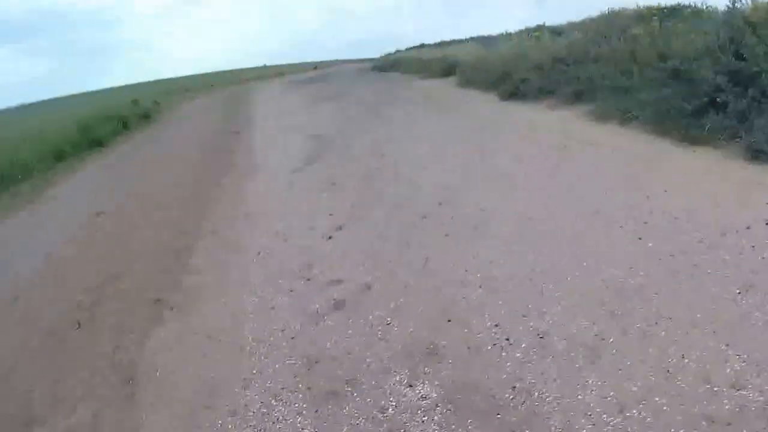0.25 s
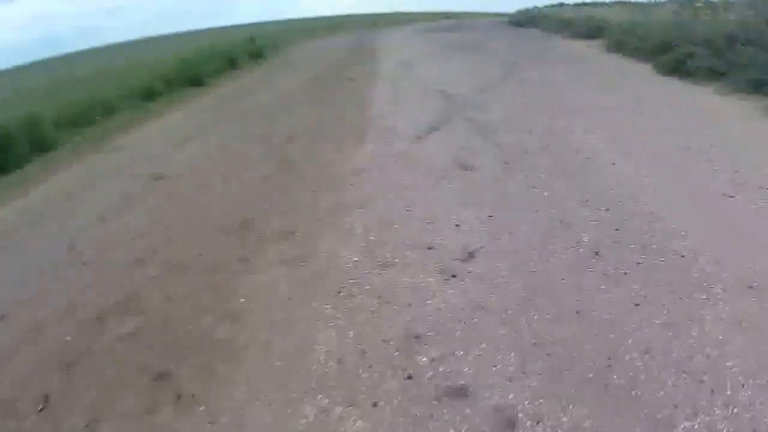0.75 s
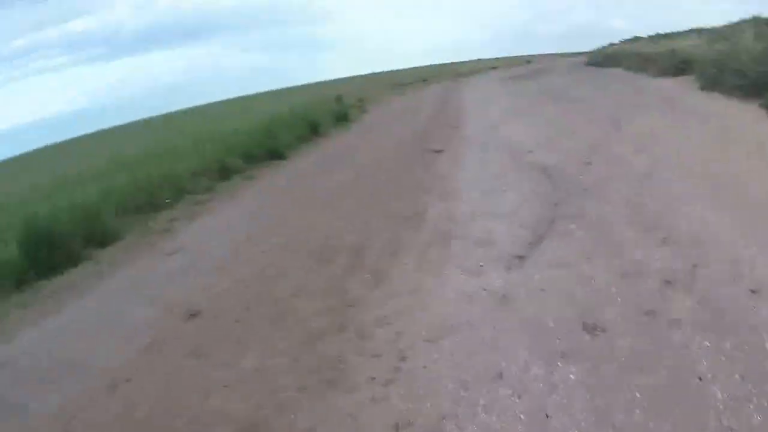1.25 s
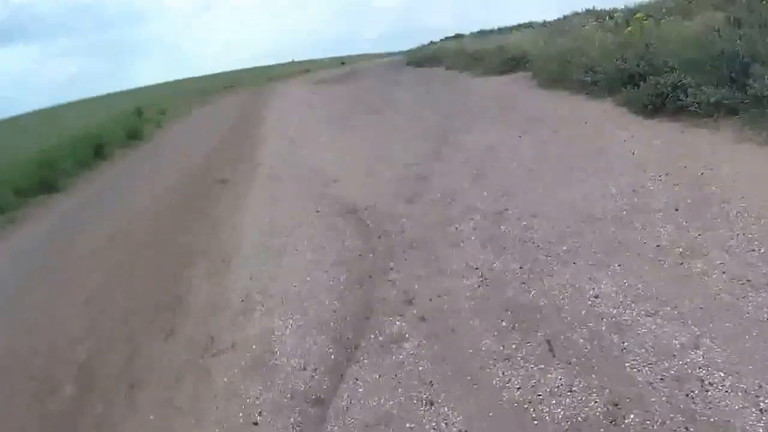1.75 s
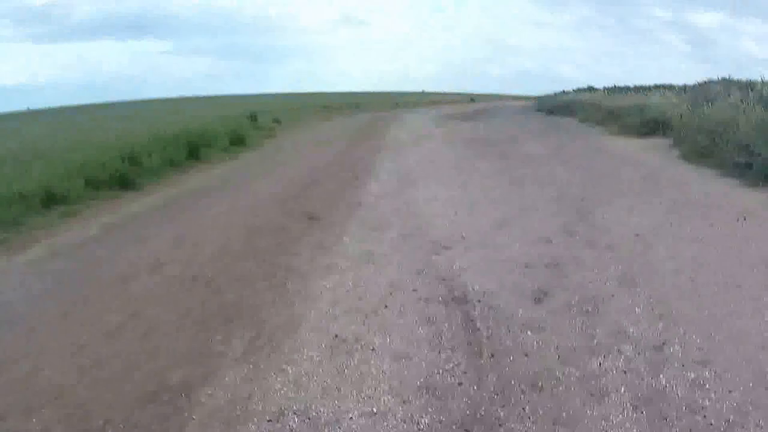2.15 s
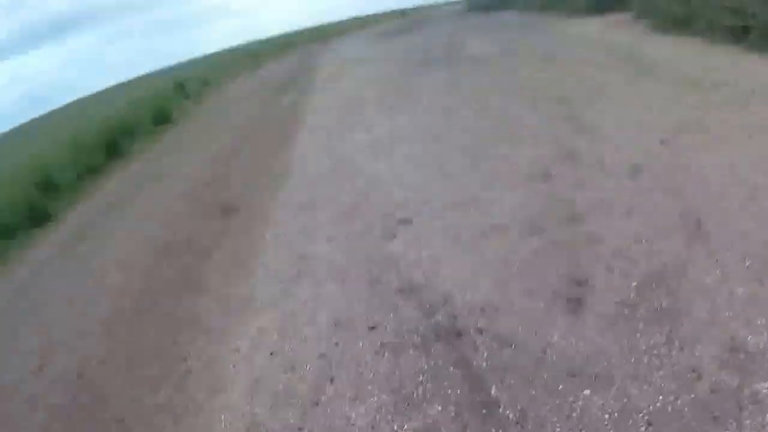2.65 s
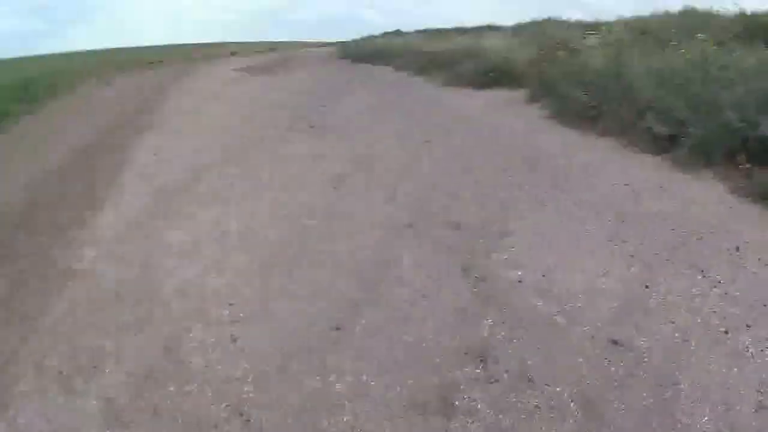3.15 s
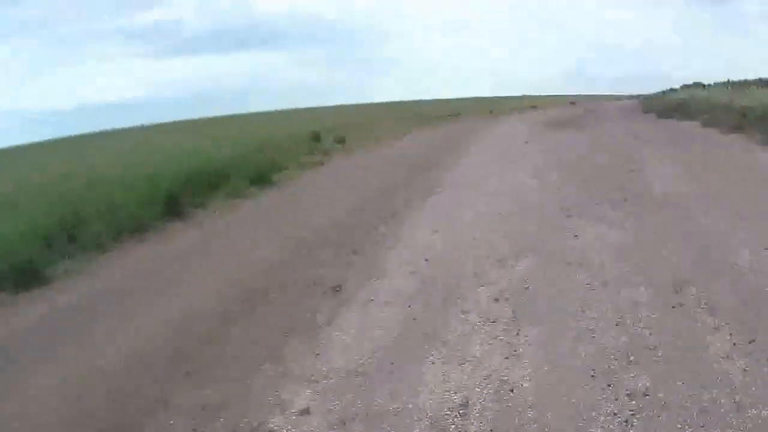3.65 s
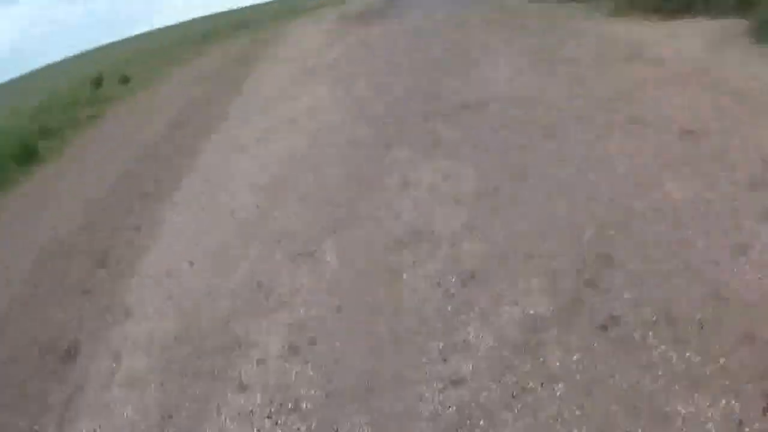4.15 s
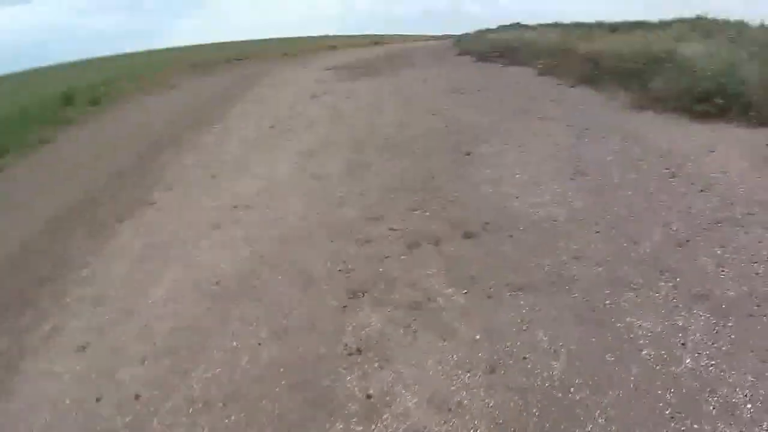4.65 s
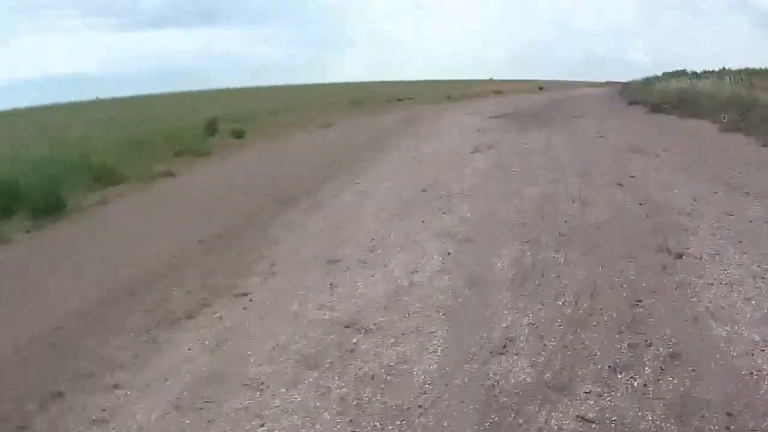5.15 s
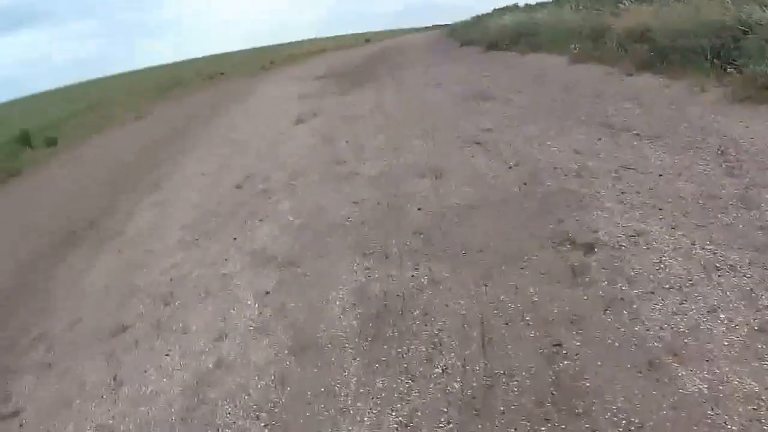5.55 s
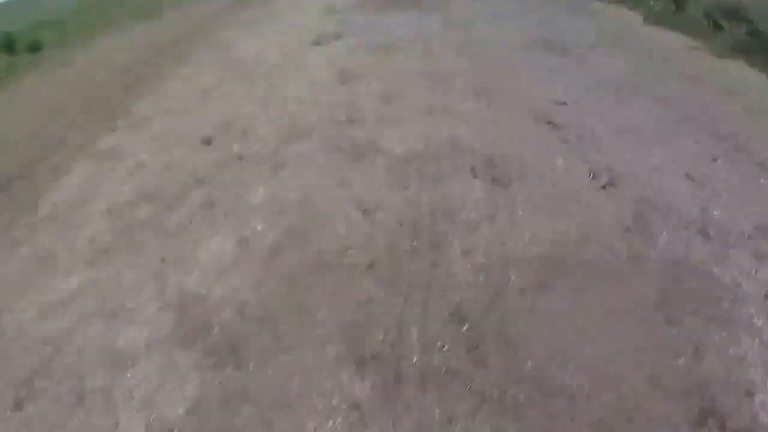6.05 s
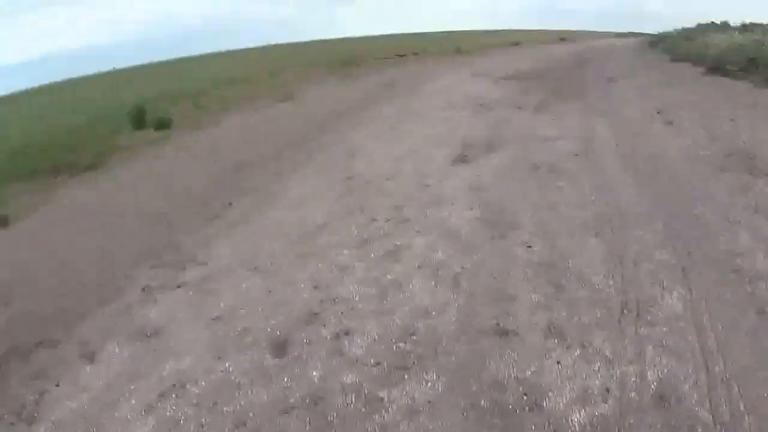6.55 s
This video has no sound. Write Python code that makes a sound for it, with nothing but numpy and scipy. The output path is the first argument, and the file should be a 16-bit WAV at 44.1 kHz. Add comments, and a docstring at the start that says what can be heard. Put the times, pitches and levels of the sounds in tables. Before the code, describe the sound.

Steady running footsteps crunch on a sandy gravel track while a plastic camera case clacks and rattles with each stride.

```python
"""Running on gravel, camera on the body

A runner on a sandy gravel track carries a camera, its two microphones inside a plastic case.
Each footfall jolts the case, one foot with a hard clack and the other with a soft bump. From the
ground below, the heel crunches, the sole rolls and pushes off. Between footfalls the case swings
and knocks on its mount, over the low rumble of the moving body."""
import sys
import numpy as np
from scipy.fft import rfft, irfft, next_fast_len
from scipy.io import wavfile
from scipy.ndimage import map_coordinates

SR = 44100
rng = np.random.default_rng(int(sys.argv[2]) if len(sys.argv) > 2 else 0)


def transcribe(signal):
    """Save signal, clipped to [-1, 1], as a 16-bit WAV file at the path in sys.argv[1]."""
    frames = np.atleast_2d(signal).T
    limited = np.clip(frames, -1, 1)
    pcm = np.round(limited * 32767).astype(np.int16)
    wavfile.write(sys.argv[1], SR, pcm)


N = 299439


def amp(db):
    """Decibels to gain."""
    return 10 ** (np.asarray(db) / 20)


def unit(x):
    """Scaled to rms 1."""
    return x / np.sqrt(np.mean(x ** 2) + 1e-20)


def along(points, hz):
    """(Hz, value) points joined on a log axis."""
    f, v = np.transpose(points)
    return np.interp(np.log(hz + 1), np.log(f + 1), v)


def wobble(rate):
    """A smooth random curve, rate knots a second."""
    return map_coordinates(rng.standard_normal(int(N * rate / SR) + 4), [np.arange(N) * rate / SR])


def swell(start, hold, rise_db_per_s, fall_db_per_s):
    """A gain that rises to 1 at start, holds and dies away."""
    t = np.arange(N) / SR - start
    drop_db = rise_db_per_s * np.maximum(-t, 0) + fall_db_per_s * np.maximum(t - hold, 0)
    return amp(-np.minimum(drop_db, 120))


def filtered(x, response):
    """x times a response of frequency."""
    size = next_fast_len(N + SR // 2)
    return irfft(rfft(x, size) * response(np.fft.rfftfreq(size, 1 / SR)), size)[..., :N]


def causal(db):
    """The minimum-phase response with these gains."""
    cepstrum = irfft(np.log(amp(db)))
    half = len(cepstrum) // 2
    cepstrum[1:half] *= 2
    cepstrum[half + 1:] = 0
    return np.exp(rfft(cepstrum))


# The two microphones hear nearly the same. Each row: frequency in Hz, left-right correlation.
MIC_LIKENESS = [(40, 0.71), (110, .99), (300, .99), (2500, .997), (5000, 1), (14000, 1)]

def spread(pair, colour_db):
    """Two unrelated signals coloured and mixed to a partly alike left and right of rms 1."""
    def response(hz):
        angle = np.arccos(np.clip(along(MIC_LIKENESS, hz), -1, 1)) / 2
        return amp(colour_db(hz)) * [np.cos(angle), np.sin(angle)]
    mid, side = filtered(pair, response)
    return unit(np.array([mid + side, mid - side]))


def noise(spectrum):
    """Stereo noise of rms 1, shaped by (Hz, dB) points."""
    return spread(rng.standard_normal((2, N)), lambda hz: along(spectrum, hz))


# The camera's own noise floor. Each row: frequency in Hz, relative level in dB.
HISS_SPECTRUM = [(300, 23), (2000, 14.5), (5000, 2), (12000, 9.5), (13850, 6), (14210, 22), (14550, 4),
                 (15250, -3), (15450, -30)]

def hiss(level_db=-62):
    """The camera's faint steady hiss, with a thin whine high up."""
    return amp(level_db) * noise(HISS_SPECTRUM)


# Squeaks, barely audible. Each row: start in seconds, length in seconds, pitch in Hz, level in dB.
FAINT_SQUEAKS = [(3.594, 0.12, 3330, -65), (4.89, 0.1, 3300, -65)]

def squeaks(waver=0.0033, harmonics_db=(0, 0, -6, -8)):
    """Two short thin squeaks, each a slightly wavering tone with overtones."""
    t, out = np.arange(N) / SR, np.zeros(N)
    for start, length, hz, db in FAINT_SQUEAKS:
        phase = 2 * np.pi * np.cumsum(hz * (1 + waver * wobble(150))) / SR
        arch = np.sqrt(np.abs(np.sin(np.pi * np.clip((t - start) / length, 0, 1))))
        tone = sum(amp(level) * np.sin(k * phase) for k, level in enumerate(harmonics_db, 1))
        out += amp(db) * arch * tone
    return out


# Footfalls below the camera, hard and soft foot in turn. Each row: landing in seconds; the case's jolt,
# thump and edge in dB; delay to the heel's bite in seconds; heel, roll and push-off levels in dB;
# delay to lift-off in seconds. Levels are relative.
FOOTFALLS = [(-0.035, -16, 3, 0, 0.066, -26.5, -39, -44, 0.33),
             (0.3606, -1.5, 4.5, 3.5, 0.065, -28, -33.5, -39, 0.3),
             (0.7417, 1, 0, 20, 0.066, -26.5, -33, -41.5, 0.29),
             (1.1252, -1, 3, 4.5, 0.059, -30.5, -35.5, -38, 0.3),
             (1.4979, 3, -7, 16.5, 0.062, -30.5, -36, -44, 0.3),
             (1.8901, 1, 2, 2, 0.061, -27.5, -34.5, -36, 0.3),
             (2.2632, 3, -15, 11, 0.055, -28.5, -39, -43, 0.33),
             (2.6361, 6, 0, 3.5, 0.086, -30.5, -37, -37, 0.32),
             (3.028, 2.5, -2, 14, 0.063, -28.5, -37.5, -41.5, 0.28),
             (3.4216, 0.5, 5.5, 5.5, 0.06, -31.5, -31.5, -39.5, 0.29),
             (3.795, -5.5, 10.5, 11.5, 0.053, -28, -42, -40.5, 0.29),
             (4.172, -1.5, 4, 3.5, 0.07, -27, -34, -41, 0.29),
             (4.5473, -3, 1.5, 17, 0.056, -30, -40, -44.5, 0.3),
             (4.9304, -4, 3, 2, 0.073, -27, -32.5, -40, 0.31),
             (5.3114, 1.5, -3.5, 3, 0.052, -27, -34, -48.5, 0.35),
             (5.6834, 2, 2.5, 4.5, 0.058, -30.5, -37.5, -39, 0.28),
             (6.039, -1.5, -2, 1, 0.057, -30, -36.5, -41, 0.27),
             (6.4161, -2.5, 3.5, 2.5, 0.044, -30.5, -33.5, -38, 0.29),
             (6.7826, -0.5, -0.5, 20, 0.055, -26, -35, -37, 0.28)]
# The hard foot, then the soft. Each row: delay to a flat sole in seconds, level of settling grit in dB,
# then the air puff's delay and hold in seconds, relative level in dB and decay in dB per second.
GAIT = [(.126, -59.5, .01, .03, -39.5, 72), (.17, -54.5, 0.022, 0.097, -39, 247)]
# Air right on the case. Each row: frequency in Hz, relative level in dB.
AIR_SPECTRUM = [(10, -27), (22, 4.5), (45, 4), (70, -4.5), (130, -32), (400, -75)]

def air_buffet(gain_db=-3.5, gust_db=1.5, between_puffs_db=-62.5):
    """The case dips at each landing and a puff of air pushes on it."""
    push = amp(between_puffs_db)
    for k, (start, *_) in enumerate(FOOTFALLS):
        _, _, delay, hold, db, decay = GAIT[k % 2]
        push = push + amp(db) * swell(start + delay, hold, rise_db_per_s=393, fall_db_per_s=decay)
    return push * amp(gain_db + gust_db * wobble(6.5)) * noise(AIR_SPECTRUM)


# The runner's body, heard through the mount. Each row: frequency in Hz, relative level in dB.
BODY_SPECTRUM = [(40, -5), (85, 3.5), (135, -1), (200, 2), (260, 0), (340, -7), (450, -13.5), (700, -13),
                 (1500, -61)]

def body_rumble(landing_db=-36, stance_db=-48, flight_db=-58, lumps_db=4.5):
    """Hard landings shake the case in uneven lumps, which go on more gently while a foot is down."""
    landing = sum(swell(start + 0.0047, hold=0.0051, rise_db_per_s=902, fall_db_per_s=497)
                  for start, *_ in FOOTFALLS[::2])
    stance = sum(swell(start + 0.012, hold=lift - 0.04, rise_db_per_s=600, fall_db_per_s=450)
                 for start, *_, lift in FOOTFALLS)
    shake = amp(flight_db) + amp(landing_db) * landing + amp(stance_db) * stance
    return shake * amp(lumps_db * wobble(40)) * noise(BODY_SPECTRUM)


def tread_db(rise_s=0.035, rise_db=16, ease_s=0.053, dip_db=8, release_s=0.0083):
    """Crunch level at every step: the heel bites and eases, the sole rolls flat, pushes off and leaves."""
    points = []
    for k, (start, _, _, _, bite, heel_db, roll_db, push_db, lift) in enumerate(FOOTFALLS):
        flat, settle_db, *_ = GAIT[k % 2]
        points += [(start + bite - rise_s, heel_db - rise_db), (start + bite, heel_db),
                   (start + bite + ease_s, roll_db - dip_db), (start + flat, roll_db),
                   (start + lift, push_db), (start + lift + release_s, settle_db)]
    times, db = np.transpose(points)
    return np.interp(np.arange(N) / SR, np.maximum.accumulate(times), db)


# Grit underfoot, heard from up on the body. Each row: frequency in Hz, relative level in dB.
GRIT_SPECTRUM = [(200, -30), (450.0, -14), (750.0, -11), (1300.0, -15), (1750.0, -2.5), (2200.0, 2),
                 (3000.0, -17), (4000.0, -14), (5200.0, -25.5), (6500.0, -35.5), (7300.0, -36),
                 (9500.0, -30.5), (12000.0, -24), (15000.0, -31)]
# Outside sound reaches the microphones through narrow resonances of the case wall.
# Each row: centre in Hz, width in Hz, lift in dB.
WALL_RESONANCES = [(928, 137, 9), (1117, 116, 14.5), (1403, 150, 10), (1674, 100, 8), (1918, 130, 6),
                   (2025, 96, 4), (2216, 95, 5.5), (2503, 103.0, 7), (2815, 190, 12), (2990, 153, 15),
                   (3366, 176, 16), (3625, 130, 4), (3890, 140, 11), (4360, 175, 9), (4970, 160, 11.5),
                   (5430, 210, 16), (6040, 270, 15), (7970, 379.0, 6), (8500, 380, 14.5),
                   (11200, 286.0, -1)]
# The swinging foot brushes loose grit. Each row: time in seconds, relative level in dB.
FOOT_BRUSHES = [(0.334, -38.5), (0.678, -41), (1.056, -46), (3.328, -43.5), (3.408, -38), (4.895, -42),
                (5.635, -43)]

def gravel(gain_db=-1, grains_per_s=900, size_db=2, stones_db=2, clump_db=2, uneven_db=1.14):
    """Sand hisses and small stones snap against each other; the case wall rings with both."""
    def colour_db(hz):
        wall_db = sum(db / (1 + (2 * (hz - centre) / width) ** 2)
                      for centre, width, db in WALL_RESONANCES)
        return along(GRIT_SPECTRUM, hz) + wall_db
    snaps = rng.random(N) < grains_per_s / SR
    sizes = amp(size_db * np.minimum(rng.exponential(size=N), 4))
    pebbles = snaps * sizes * rng.standard_normal((2, N))
    grit = rng.standard_normal((2, N)) + amp(stones_db) * unit(pebbles)
    brushes = sum(amp(db) * swell(start, hold=0.00093, rise_db_per_s=3000, fall_db_per_s=1000)
                  for start, db in FOOT_BRUSHES)
    pressure = amp(tread_db()) + brushes
    clumps = amp(gain_db + clump_db * wobble(90) + uneven_db * wobble(25))
    return pressure * clumps * spread(grit, colour_db)


# The plastic case, ringing right around the microphones. Each row: centre in Hz, width in Hz,
# then strength in dB when struck at the clack, knock, bump and tick spots.
CASE_RESONANCES = [(197, 256.6, 27, 26.5, 27, 19), (264.5, 200.5, 28, 28.5, 28, 20.5),
                   (564, 168, 17, 20, 10, 10), (872, 86, 28.5, 27.5, 13.5, 11.5),
                   (1126, 76.3, 31, 23.5, 19.5, 14), (1466, 130, 28, 19.5, 11, 14),
                   (1687, 158, 33.5, 17.5, 11, 18.5), (1844, 152, 30.5, 19.5, 15.5, 16.5),
                   (2084, 141.5, 33, 20.5, 17, 24.5), (2267, 250, 30, 15, 16, 18.5),
                   (2851, 169, 24, 14, 7.5, 9.5), (3565, 236, 13.5, 11, 5.5, 7),
                   (4005, 94, 7, -6.5, 5.5, 2.5), (5210, 590, -9, 2, -12.5, -5.5),
                   (7700, 4700, -31, -63, -42, -32), (8590, 180, -12, -52, -7, -16),
                   (12300, 3900, -30, 5, -20.5, -39)]
CLACK, KNOCK, BUMP, TICK = range(4)

def strike_case(blows, spot, gain_db, chatter_t60, soft_hz, detune=0.021, apart_db=-12, lead_in_db=-19):
    """Blows ring one spot. Each: time in seconds, then level, thump, hollow and edge in relative dB."""
    size, lead = 2048, 256  # samples per blow, and how many precede the impact
    lead_in_t60, chatter_share, grip_db = 0.012, 0.4, 0.71
    hz, t = np.fft.rfftfreq(size, 1 / SR), (np.arange(size) - lead) / SR
    centre, width, *spots_db = np.transpose(CASE_RESONANCES)[:, :, None]
    # neighbouring resonances swing in opposite directions, so a blow takes a few cycles to peak
    strength = amp(spots_db[spot]) * (-1) ** np.arange(len(centre))[:, None]
    # a softer contact lasts longer and excites no high resonances
    contact_db = -10 * np.log10(1 + (hz / soft_hz) ** 10)
    out = np.zeros((2, lead + N + size))
    for start, db, thump_db, hollow_db, edge_db in blows:
        # the grip of the mount shifts the resonances a little from blow to blow
        shifted = centre * (1 + detune * rng.standard_normal())
        grip = amp(grip_db * rng.standard_normal(centre.shape))
        damping = 1j * hz * width
        ring = np.sum(grip * strength * damping / (shifted ** 2 - hz ** 2 + damping), axis=0)
        tone_db = along([(300, thump_db), (520, hollow_db), (1150, hollow_db),
                         (1550, 0.013), (2800, 0.0076), (6000, edge_db)], hz)
        response = ring * causal(contact_db + tone_db)
        # a faint rise of noise softens the attack; the faces chatter briefly after the blow
        white = rng.standard_normal((2, size))
        lead_in = white[0] * (t < 0) * amp(-60 * np.abs(t) / lead_in_t60)
        chatter = white * (t >= 0) * amp(-60 * np.abs(t) / chatter_t60)
        chatter_mid, chatter_side = rfft(chatter / np.linalg.norm(chatter[0]))
        impact = (t == 0) + amp(lead_in_db) * lead_in / np.linalg.norm(lead_in)
        force = rfft(impact) + chatter_share * chatter_mid
        # short waves reach the two microphones differently
        side = amp(apart_db) * chatter_side * np.minimum(hz / 5000, 1) ** 2
        at = round(start * SR)
        out[:, at:at + size] += amp(db + gain_db) * irfft(response * [force + side, force - side])
    return out[:, lead:lead + N]


def shifting_stones(level_db=-17, scatter_db=2.5, thump_db=4, hollow_db=7, edge_db=4, per_step=3):
    """While a foot is down, a few larger stones shift under it with faint dull clicks."""
    clicks = [(start + lift * rng.random(), level_db + scatter_db * rng.standard_normal())
              for start, *_, lift in FOOTFALLS for _ in range(per_step)]
    blows = [(s, db, thump_db, hollow_db, edge_db) for s, db in clicks if 0 < s < N / SR]
    return strike_case(blows, TICK, gain_db=-0.5, chatter_t60=0.039, soft_hz=10000, detune=0.074)


# The case drops back on its seat as the hard foot pushes off.
# Each row: time in seconds, relative level in dB, thump in dB.
SEAT_THUDS = [(0.2325, 3.5, -8.5), (0.2584, 4.5, -2), (1.106, -11, 3.5), (1.786, 4, -2), (2.469, -1, -9),
              (2.5254, 7, -0.5), (2.5446, 5, -0.5), (2.624, -7.5, 2.5), (3.2205, -5, 1),
              (3.9971, 3.5, -6.5), (4.0639, -2, -1), (4.819, 4, -2), (5.4444, 0.5, -5), (5.5607, -1.5, -2),
              (5.599, 3.5, -1), (5.671, -5, 4), (5.697, -6, -8)]
# In mid-stance the loaded leg taps the case against its mount.
# Each row: time in seconds, relative level in dB, hollow tone in dB.
MOUNT_TAPS = [(0.104, -12.5, 14.5), (0.5889, 0, -1), (0.8768, -6, 7), (1.226, -15, 15), (1.356, -5.5, 0.5),
              (1.641, -4, 5.5), (2.1275, -2.5, -1), (2.4, -5.5, 8.5), (2.881, -5.5, 0.5), (3.1659, -14, 10),
              (3.6365, -1.5, -2), (3.9219, -6.5, 10), (4.4126, -10.5, -2), (4.682, -6.5, 9.5),
              (5.1714, 0, -2), (5.468, 3, 3.5), (6.1673, -5, 9), (6.6281, -2, -1)]
# Stray ticks next to the microphones; a broad one has both more thump and more edge.
# Each row: time in seconds, relative level in dB, breadth in dB.
LOOSE_TICKS = [(0.0336, -11.5, 2), (0.0584, -15, 12), (0.2766, -11, 12), (0.3873, -2, -6),
               (0.8028, -7.5, 2), (0.9108, -4, 9.5), (0.933, -0.5, -12), (0.946, 6, -4), (1.153, -4.5, -2),
               (1.274, 7.5, -8), (1.5546, -8, 7), (1.6984, -4.5, 2), (1.792, -7, 6.5), (1.9019, -2.5, -11),
               (2.2596, -6, -4), (2.2805, -4, 4), (2.5112, -8, 6), (2.6468, -2, -13), (3.2274, -1.5, 10.5),
               (3.2324, 3.5, 2), (3.2471, 7, -5), (3.458, -8, 5), (3.491, -5, 2), (3.7817, -2, -13),
               (4.244, -15.5, 9), (4.946, -1, -8), (5.0186, -6, 1.5), (5.4789, 7, -10), (5.4991, -1, -4),
               (6.069, -7, 3), (6.2463, -6.5, 9), (6.4507, -2.5, 5)]

def case_rattle(thud_hollow_db=-6, thud_edge_db=-6, tap_thump_db=4, tap_edge_db=8,
                tick_thump_db=1, thump_share=0.81, tick_hollow_db=0.1):
    """The loose case thuds on its seat, taps its mount and ticks now and then."""
    thuds = [(s, db, thump, thud_hollow_db, thud_edge_db) for s, db, thump in SEAT_THUDS]
    taps = [(s, db, tap_thump_db, hollow, tap_edge_db) for s, db, hollow in MOUNT_TAPS]
    ticks = [(s, db, tick_thump_db + thump_share * breadth, tick_hollow_db, breadth)
             for s, db, breadth in LOOSE_TICKS]
    return (strike_case(thuds, BUMP, gain_db=-2, chatter_t60=0.029, soft_hz=6360)
            + strike_case(taps, TICK, gain_db=-1.17, chatter_t60=0.026, soft_hz=8300, detune=0.034)
            + strike_case(ticks, TICK, gain_db=-1.64, chatter_t60=0.029, soft_hz=9700, detune=0.056))


# The mount, close up, late in the soft foot's stance. Each row: time in seconds, relative level in dB,
# delay to the rebound in seconds, its relative level in dB.
MOUNT_SWINGS = [(0.6382, 0.5, 0.059, -2), (1.4048, 5.5, .033, 6), (2.1677, 4, 0.041, 3),
                (2.9286, 2.5, 0.037, 1.5), (3.7083, 2.5, 0.034, -2), (4.4545, 8.5, .0353, 2.5),
                (5.2104, 3, .0503, -1.5), (5.9489, 8, 0.034, -1), (6.6953, 6.5, 0.035, 1)]

def mount_knocks(knock_tone_db=(1, -2, -16), rebound_tone_db=(-1.5, 3, -8)):
    """The mount swings over: a dull knock, then a lighter rebound. Tones are thump, hollow and edge."""
    knocks = [(s, db, *knock_tone_db) for s, db, _, _ in MOUNT_SWINGS]
    rebounds = [(s + delay, db, *rebound_tone_db) for s, _, delay, db in MOUNT_SWINGS]
    return (strike_case(knocks, KNOCK, gain_db=-2, chatter_t60=0.03, soft_hz=3900)
            + strike_case(rebounds, TICK, gain_db=-1.1, chatter_t60=0.04, soft_hz=11300))


# Bounces after a clack, right at the microphones. Each row: time in seconds, relative level in dB.
STOP_BOUNCES = [(0.7612, 0), (1.5105, -1), (1.531, -6.5), (2.276, -1), (2.2972, -5), (3.044, 0),
                (3.0676, -7), (3.826, -5), (4.5576, 1), (4.5705, -12.5), (5.321, -2.5), (6.0687, -4)]

def landing_jolts(clack_hollow_db=-2.5, bump_hollow_db=2, bounce_tone_db=(7, 2, 4)):
    """The hard foot slams the case into its stop, where it bounces; the soft foot only bumps it."""
    hard, soft = FOOTFALLS[2::2], FOOTFALLS[1::2]
    clacks = [(s, db, thump, clack_hollow_db, edge) for s, db, thump, edge, *_ in hard]
    bumps = [(s, db, thump, bump_hollow_db, edge) for s, db, thump, edge, *_ in soft]
    bounces = [(s, db, *bounce_tone_db) for s, db in STOP_BOUNCES]
    return (strike_case(clacks, CLACK, gain_db=-0.5, chatter_t60=0.021, soft_hz=7030,
                        lead_in_db=-22, apart_db=-8.5)
            + strike_case(bounces, TICK, gain_db=-1, chatter_t60=0.02, soft_hz=13000)
            + strike_case(bumps, BUMP, gain_db=-1.5, chatter_t60=0.027, soft_hz=14000))


# Balance of the microphone pair. Each row: frequency in Hz, left minus right in dB.
MIC_BALANCE = [(40, -1), (110, -3), (300, -3), (3000, -3), (5000, -2), (7000, -0.5), (14000, 0)]

def scene():
    """All sources from inside the case, a little stronger on the right microphone."""
    case = landing_jolts() + mount_knocks() + case_rattle()
    ground = shifting_stones() + gravel()
    background = body_rumble() + air_buffet() + squeaks() + hiss()
    balance = lambda hz: amp(np.outer([0.5, -0.5], along(MIC_BALANCE, hz)))
    return filtered(case + ground + background, balance)


def record(dry):
    """Each channel sits slightly off zero, the hardest clacks flatten; nothing sounds above 16 kHz."""
    offset, knee, top_hz = np.array([[-0.0247], [0.0128]]), 6, 15900
    clipped = dry / (1 + np.abs(dry) ** knee) ** (1 / knee)
    return offset + filtered(clipped, lambda hz: hz < top_hz)


dry = scene()
out = record(dry)
transcribe(out)
```